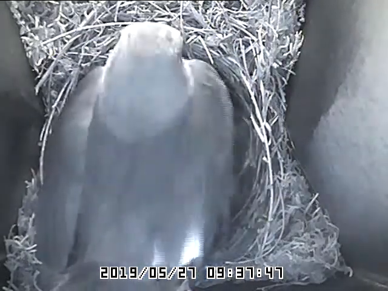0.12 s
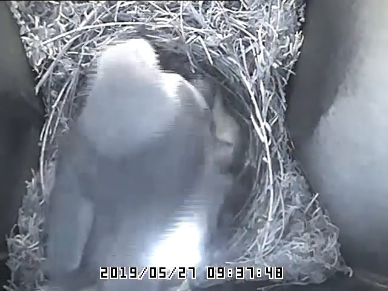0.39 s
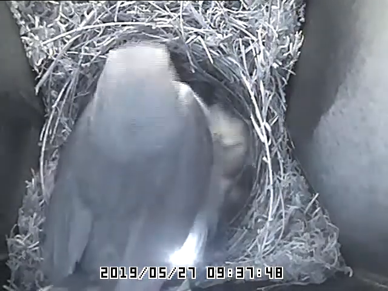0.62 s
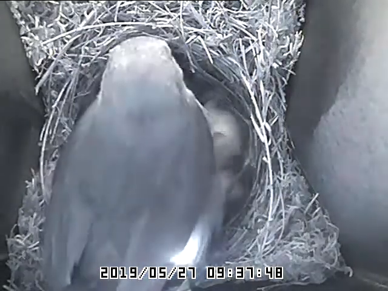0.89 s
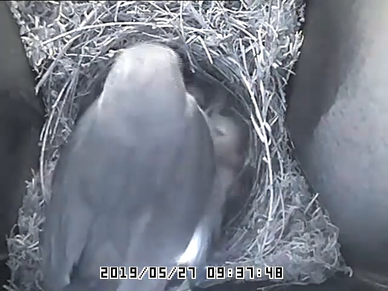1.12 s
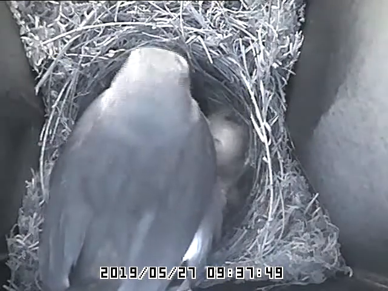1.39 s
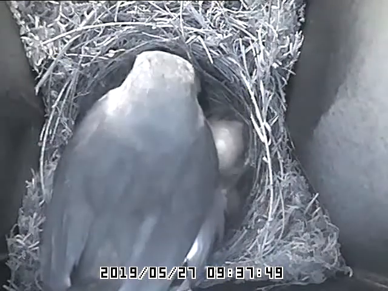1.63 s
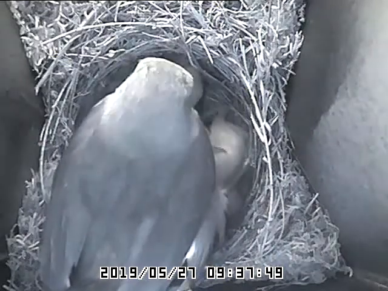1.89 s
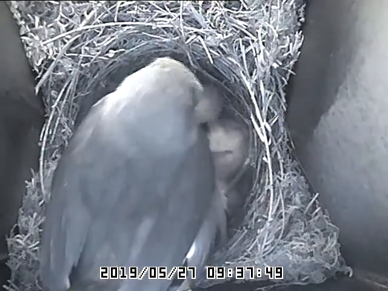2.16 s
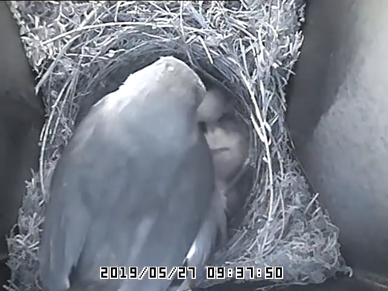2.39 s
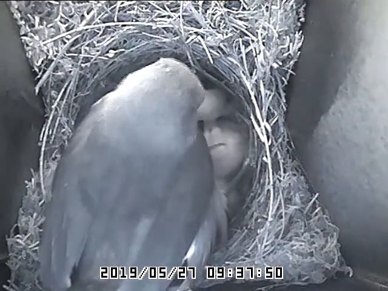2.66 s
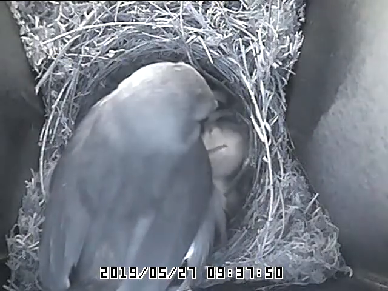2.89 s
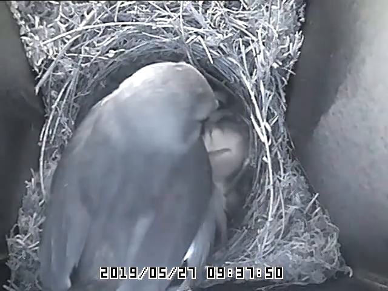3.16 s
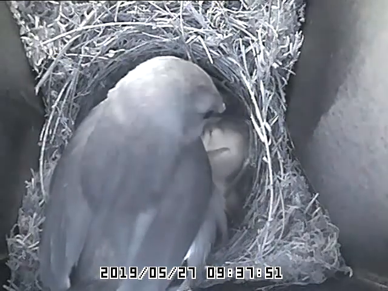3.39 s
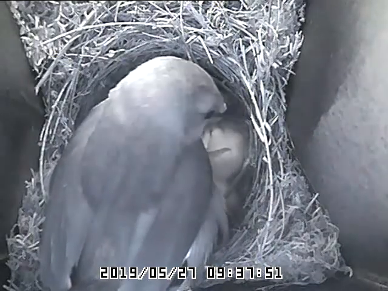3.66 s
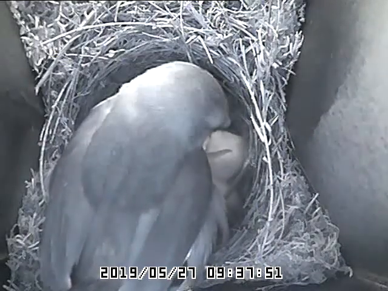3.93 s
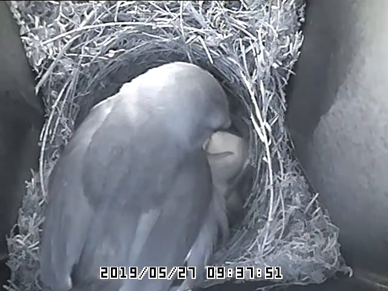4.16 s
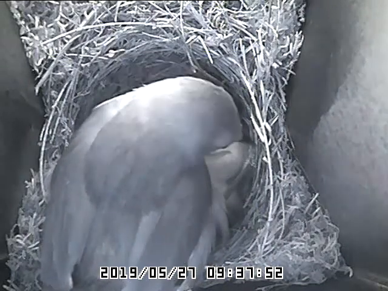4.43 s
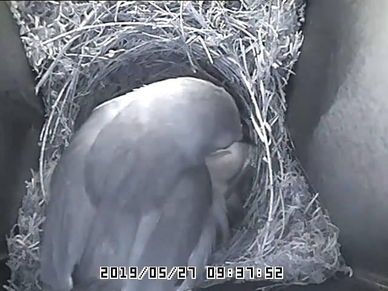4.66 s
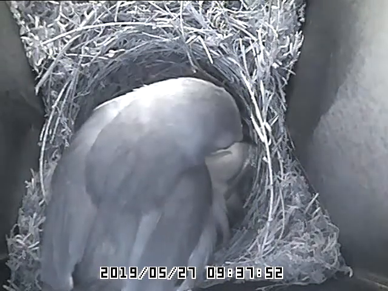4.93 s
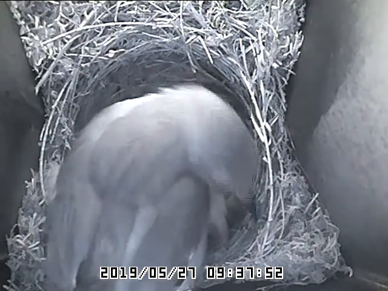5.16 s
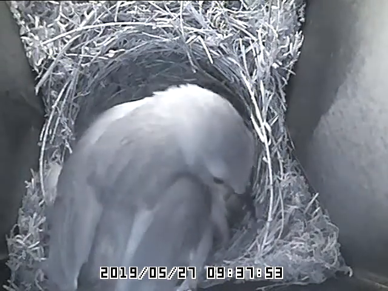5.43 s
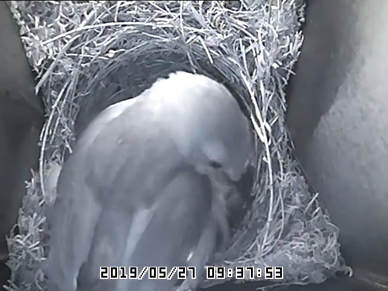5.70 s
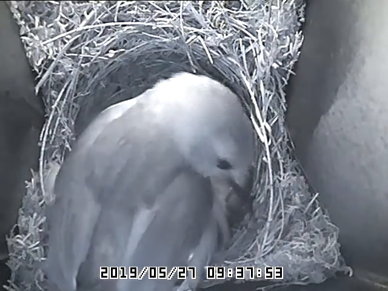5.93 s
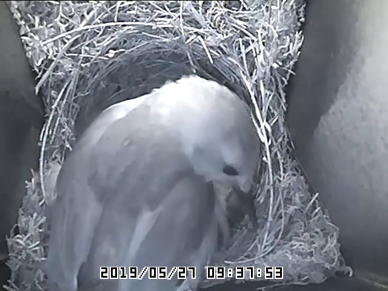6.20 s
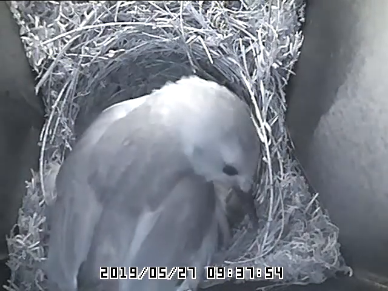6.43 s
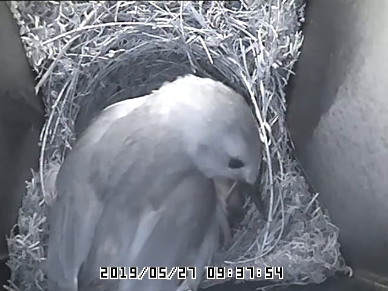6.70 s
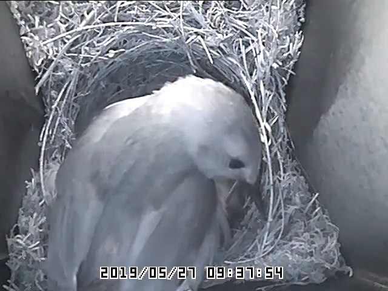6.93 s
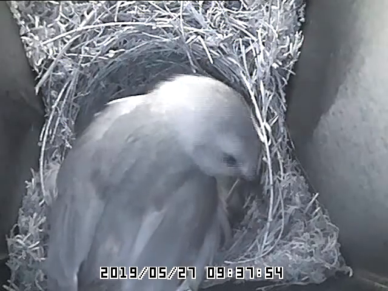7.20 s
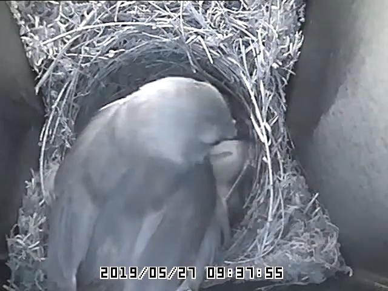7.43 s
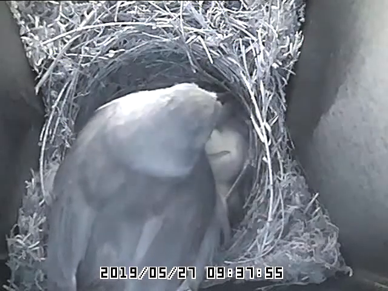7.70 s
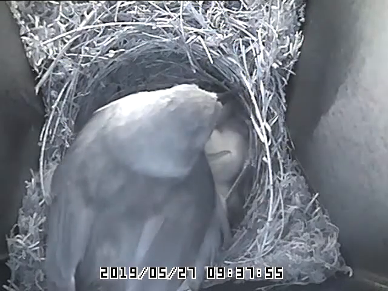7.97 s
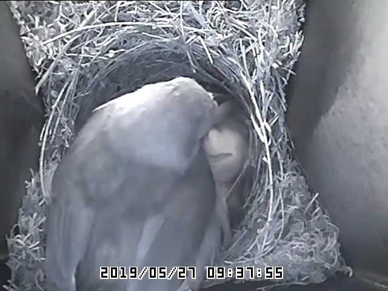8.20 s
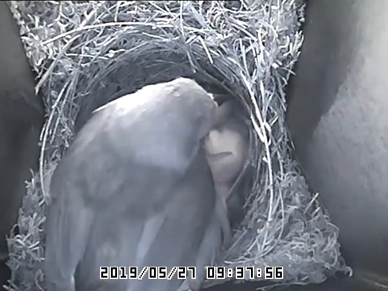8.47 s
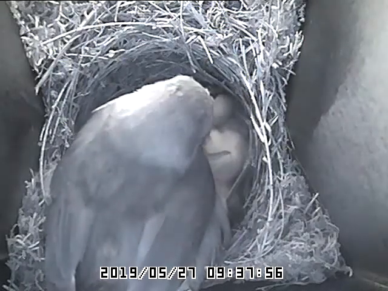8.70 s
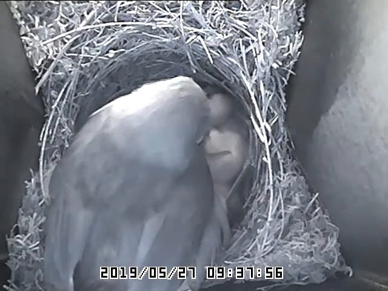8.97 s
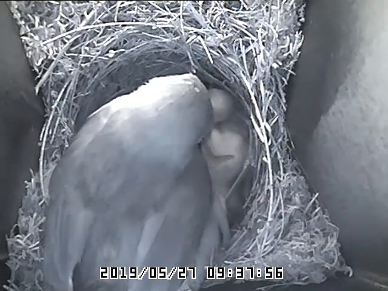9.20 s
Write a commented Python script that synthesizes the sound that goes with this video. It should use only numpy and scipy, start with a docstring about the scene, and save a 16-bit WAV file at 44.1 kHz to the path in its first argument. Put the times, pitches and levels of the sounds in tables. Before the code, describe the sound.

Tiny high peeps from a nestling about once a second over steady camera buzz, thin whine and hiss, with buzzy birdsong echoing outside.

```python
"""Inside a wooden nest box, heard through a cheap camera: a nestling peeps, mostly about once a second, as
pure arches in pitch through a box resonance. Birds outside sing buzzing glides with scattered echoes;
there are faint squeaks in the box, whistles mostly outside, and one sharp two-voiced call in the box.
The picture signal leaks in: a folded-down line tone and a supply whistle, both cut 50 times a second, over hiss.
Sampling at 16 kHz gives whatever lies near 8 kHz a mirror image above it."""
import sys
import numpy as np
from scipy import signal
from scipy.fft import rfft, irfft, next_fast_len
from scipy.io import wavfile
from scipy.ndimage import uniform_filter1d

SR = 44100
rng = np.random.default_rng(int(sys.argv[2]) if len(sys.argv) > 2 else 0)


def store_pcm(level_fs):
    """Save levels as 16-bit WAV."""
    pcm = np.round(np.clip(level_fs, -1, 1) * 32767).astype(np.int16)
    wavfile.write(sys.argv[1], SR, np.atleast_2d(pcm).T)


def ratio(d):
    """dB to gain"""
    e = np.asarray(d, float) / 20
    return 10 ** e


N = 411894
T = np.arange(N) / SR
SAMPLE_HZ = 16000  # sampling rate of the camera's sound


def shaped(x, points):
    """Filter by a table of (Hz, dB), straight lines between points."""
    size = next_fast_len(N)
    hz, db = np.transpose(points)
    bins_hz = np.arange(size // 2 + 1) * SR / size
    return irfft(rfft(x, size) * ratio(np.interp(bins_hz, hz, db)), size)[:N]


def resonance(x, hz, width_hz):
    """Two-pole peak with gain 1 on top."""
    r = np.exp(-np.pi * width_hz / SR)
    zeros = [(1 - r * r) / 2, 0, (r * r - 1) / 2]
    poles = [1, -2 * r * np.cos(2 * np.pi * hz / SR), r * r]
    return signal.lfilter(zeros, poles, x + 1e-18)


def wander(draws):
    """Random values spread evenly over the scene, joined by straight lines."""
    return np.interp(T, np.linspace(0, T[-1], len(draws)), draws)


def add(out, start_s, hz, level, fade_s):
    """Lay in a sine of given pitch and rms level per sample, with soft ends."""
    t = np.arange(len(hz)) / SR
    ends = np.clip(np.minimum(t, t[-1] - t) / fade_s, 0, 1)
    tone = np.sqrt(2) * level * ends * np.sin(2 * np.pi * np.cumsum(hz) / SR)
    at = round(start_s * SR)
    out[at:at + len(hz)] += tone[:N - at]


def camera():
    """Tones above half the sampling rate fold down; all fall away while the picture is blanked."""
    line_hz, field_hz, supply_hz = 15623.809, 49.9962, 9998.019
    blank_from_ms, blank_to_ms = 17.55, 19.15
    # Overtones of the line tone. Each row: multiple, rms level in dB before brightness.
    line_tone = [(1, -37.5), (2, -51), (3, -59), (4, -64), (5, -68), (6, -70), (7, -82), (8, -69.5)]
    # Steady brightness down a field. Each row: time in ms, level in dB, sideways shift in rad.
    picture = [(0.35, 2.4, -0.12), (1.0, 1.5, -0.052), (2.5, -2, 0.045), (4.5, -1.83, 0.003),
               (5.5, -0.37, 0.023), (7.0, -0.3, 0.1), (8.5, -1.07, 0.059), (10.0, -1.5, 0.041),
               (10.5, 0, -0.073), (13.5, 1, -0.032), (15, -1.5, -0.27), (16.5, -0.3, 0.052),
               (17.5, 2.5, -0.00043)]
    # The parent's pale head, a bright patch that mostly sinks as it bends over the brood.
    # Each row: time in seconds, place down the field in ms.
    head = [(0.0, 3.5), (1.4, 2.96), (4.2, 3.67), (5.0, 4.74), (7.2, 4.5), (7.7, 5)]
    # Edge ticks, a row for even fields and one for odd: height in dB at blanking start, at blanking end,
    # before the line phase scales it.
    edge_db = [
        [-33.5, -25.5],
        [-45.5, -38.5],
    ]
    # Steady kicks of the field sync. Each row: time in ms, height.
    sync = [(17.62, -0.034), (17.86, 0.0083), (19.0, -0.0011)]

    ms = T * field_hz % 1 * 1000 / field_hz  # time into the field
    blank = uniform_filter1d(1. * ((ms > blank_from_ms) & (ms < blank_to_ms)), size=4)

    down_ms, still_db, shift_rad = np.transpose(picture)
    head_ms = np.interp(T, *np.transpose(head))
    head_db = 3.0 * np.exp(-((ms - head_ms) / 1.37) ** 2)
    # a patch of glare low in the picture fades out over 1.5 s
    glare_db = 3.5 * np.exp(-((ms - 12.3) / 1.3) ** 2) * np.clip(1 - T / 1.5, 0, 1)
    bright_db = np.interp(ms, down_ms, still_db, period=20) + head_db + glare_db
    aside_rad = np.interp(ms, down_ms, shift_rad, period=20)

    turn = 2 * np.pi * (SAMPLE_HZ - line_hz) * T
    line = sum(ratio(db) * np.cos(k * (turn + aside_rad) - 1.15 + 1.5 * np.log(k)) for k, db in line_tone)
    waver_db = 0.47 * wander(rng.standard_normal(100))
    blank_line_db, blank_supply_db = -21, -8
    line *= np.sqrt(2) * ratio(bright_db + waver_db) * (1 - blank * (1 - ratio(blank_line_db)))

    # the picture loads the supply: it sags and is pulled to and fro in each field
    wobble_rad, wobble_top_ms = 0.42, 7.6
    wobble = wobble_rad * np.cos(2 * np.pi * field_hz * (ms - wobble_top_ms) / 1000)
    swing = 2 * np.pi * supply_hz * T - wobble
    clock = 2 * np.pi * SAMPLE_HZ * T
    supply = ratio(-37.5) * np.cos(clock - swing)
    supply += ratio(-55) * np.cos(2 * swing - clock)  # second harmonic, folded
    sag_db = -3 * ((ms + 1) % 20) / 20
    # softer-edged blanking that ends 12 samples sooner
    slow_blank = uniform_filter1d(np.maximum(0, blank + np.roll(blank, -12) - 1), size=15)
    supply *= np.sqrt(2) * ratio(sag_db) * (1 - slow_blank * (1 - ratio(blank_supply_db)))

    # interlace cuts every other field half a line off: its edges tick in step with the line tone
    field = np.arange(int(T[-1] * field_hz))
    ticks = np.zeros(N)
    edges_ms = (blank_from_ms - .08, blank_to_ms + .05)
    for edge_ms, sign, db in zip(edges_ms, (-1, 1), np.transpose(edge_db)):
        at = ((field / field_hz + edge_ms / 1000) * SR).astype(int)
        ticks[at] = sign * ratio(db[field % 2]) * np.sin(turn[at] - 1.15)
    for kick_ms, height in sync:
        at = ((field / field_hz + kick_ms / 1000) * SR).astype(int)
        ticks[at] += height
    ticks = np.convolve(ticks, np.hanning(7), "same")

    blank_step, offset = .002, -.0051  # full scale = 1
    return line + supply + ticks + blank_step * blank + offset


def hiss():
    """Amplifier noise and far air, up to half the sampling rate."""
    # Spectrum of the noise. Each row: frequency in Hz, relative level in dB.
    hiss_spectrum = [(30, -8), (100, -5), (300, -1.5), (600, -2.5), (1000, -5), (2500, -5.5), (3800, -2),
                     (4800, -4.5), (5600, -1), (6500, -1.5), (7100, -6), (8000, -8)]
    rms_db = -49
    noise = shaped(rng.standard_normal(N), hiss_spectrum + [(SAMPLE_HZ / 2 + 1, -120)])
    return ratio(rms_db) * noise / np.std(noise)


def song(calls):
    """Glides with an uneven buzz in pitch, smeared by scattered echoes from the trees."""
    # Notes sung. Each row: start in seconds, kind of note, length in seconds, level in dB before flutter and echo.
    song_notes = [(0, "whistle", .11, -42.5), (.12, "high", .17, -45.5), (0.205, "trill", 0.15, -44),
                  (.41, "high", 0.094, -43.5), (0.466, "trill", .15, -45), (.682, "low", 0.092, -51.5),
                  (.75, "buzz", 0.15, -52), (.9, "low", .14, -53.5), (.998, "trill", .14, -52.5),
                  (1.16, "seep", 0.12, -60), (1.325, "rise", 0.058, -55), (1.44, "seep", 0.097, -56),
                  (1.47, "short", .036, -52), (1.54, "short", 0.054, -54), (1.583, "rise", 0.055, -53),
                  (1.679, "upper", 0.22, -59), (1.7, "seep", .087, -54), (1.835, "rise", 0.06, -51.5),
                  (1.63, "buzz", .1, -53), (1.88, "buzz", 0.13, -54), (2.092, "rise", 0.062, -50),
                  (2.143, "buzz", .12, -54), (2.22, "seep", .04, -55), (3.125, "upper_whistle", .12, -53),
                  (3.6, "far", .08, -53), (3.78, "far", .13, -58), (3.8, "buzz", 0.056, -55),
                  (3.95, "upper_whistle", .07, -56), (4.057, "buzz", .045, -45.5),
                  (4.108, "upper_whistle", .05, -50), (5.5, "short", 0.16, -59),
                  (6.996, "buzz", 0.078, -52), (7.13, "upper_whistle", 0.092, -58),
                  (7.566, "whistle", 0.16, -45.5), (7.763, "pip", .045, -46),
                  (7.809, "upper_whistle", 0.13, -42), (8.002, "high", 0.1, -43.5),
                  (8.05, "trill", 0.14, -45), (8.24, "high", 0.094, -44), (8.299, "trill", .14, -44),
                  (8.5, "low", 0.14, -55), (8.561, "buzz", .18, -53), (8.567, "upper", .12, -51),
                  (8.75, "low", 0.072, -53), (8.8, "upper", .06, -51), (8.84, "buzz", 0.14, -53.5),
                  (9.094, "rise", 0.046, -49), (9.118, "buzz", 0.073, -45), (9.13, "held", .17, -51.5)]
    # Kinds of note. Each entry: from Hz, to Hz, nominal buzz width in Hz, power of the glide,
    # level change along the note in dB.
    note_kinds = dict(whistle=(5050, 4590, 110, .25, -3), upper_whistle=(5000, 4740, 130, .25, -5),
                  high=(5800, 5850, 76, 1.1, -5), trill=(4820, 4450, 400, 1.2, -6),
                  low=(3830, 3750, 86, 1.5, -5), buzz=(4750, 4700, 300, 1.1, -6),
                  upper=(5350, 5400, 160, 1.1, -5), rise=(4000, 5050, 70, 2.6, 5),
                  seep=(7100, 7080, 96, 1.1, -5), short=(4500, 4500, 50, 1.1, -5),
                  pip=(4050, 4030, 51, 1.1, -5), far=(3350, 3300, 281, 1.1, -5),
                  held=(4880, 4830, 90, 1.1, -6))
    edge_s, direct_db, t60_s = 0.0091, -1, 0.95

    buzz_per_s = 130 * wander(rng.uniform(.2, 1.7, 900))
    depth = wander(rng.uniform(.25, 1.7, 700))
    buzz = depth * np.sin(2 * np.pi * np.cumsum(buzz_per_s) / SR)
    dry_song = np.zeros(N)
    for start_s, kind, length_s, db in song_notes:
        from_hz, to_hz, width_hz, power, fade_db = note_kinds[kind]
        part = buzz[round(start_s * SR):round((start_s + length_s) * SR)]
        along = np.linspace(0, 1, len(part))
        hz = from_hz + (to_hz - from_hz) * along ** power + width_hz * part
        add(dry_song, start_s, hz, ratio(db + fade_db * along), edge_s)

    flutter_db = 4.3 * wander(rng.uniform(-0.58, 1, 1200))
    tail = rng.standard_normal(SR) * ratio(-60 * T[:SR] / t60_s)
    tail /= np.sqrt(np.sum(tail ** 2))
    # the faint squeaks and whistles echo too, duller
    echoed = dry_song + ratio(-3) * shaped(calls, [(5000, 1.5), (7000, -15.5)])
    echoes = signal.fftconvolve(echoed, tail)[:N]
    heard = ratio(direct_db) * ratio(flutter_db) * dry_song + echoes
    # the box favours this band of what comes in from outside
    entrance_hz, entrance_width_hz, entrance_db = 4720, 500, -6
    return heard + ratio(entrance_db) * resonance(heard, entrance_hz, entrance_width_hz)


def nestling():
    """Pure arches, loudest where they cross the resonance of the box."""
    # Peeps. Each row: start in seconds, rise in seconds, fall in seconds, top in Hz, end in Hz.
    peeps = [(0.26, 0.022, 0.044, 7280, 6420), (1.318, 0.029, 0.022, 6950, 6520),
             (2.479, 0.028, 0.025, 7380, 6900), (3.445, 0.028, 0.027, 7360, 7000),
             (5.986, 0.017, 0.031, 6926, 6420), (6.919, 0.018, 0.025, 6990, 6450),
             (7.95, 0.022, 0.03, 7230, 7030), (9.002, 0.022, 0.02, 7230, 6900)]
    start_hz, arch_power = 6200, 2.3
    box_hz, box_width_hz, direct_db = 7000, 320, -12
    out = np.zeros(N)
    for start_s, rise_s, fall_s, top_hz, end_hz in peeps:
        db = -29.7 + 4 * (top_hz / 1000 - 7)  # more effort lifts pitch and level
        t = np.arange(round((rise_s + fall_s) * SR)) / SR - rise_s
        drop_hz = np.where(t < 0, top_hz - start_hz, top_hz - end_hz)
        from_top = np.abs(t / np.where(t < 0, rise_s, fall_s))
        add(out, start_s, top_hz - drop_hz * from_top ** arch_power, ratio(db), .004)
    return resonance(out, box_hz, box_width_hz) + ratio(direct_db) * out


def whistles():
    """Faint gliding sines, squeaks in the box and whistles mostly outside, all fluttering in level."""
    # Higher peeps, a steep rise that may bend over.
    # Each row: start in seconds, length in seconds, top the rise aims at in Hz, starting level in dB before flutter.
    squeaks = [(1.9, .02, 8640, -50), (1.937, 0.023, 8600, -47), (2.926, 0.017, 8600, -48),
               (7.051, .065, 8960, -50.5), (8.128, 0.067, 8700, -49.5), (9.094, 0.031, 8800, -52),
               (8.912, .012, 9000, -48)]
    # Whistled glides, most from a bird outside; the last goes with the sharp call in the box.
    # Each row: start in seconds, length in seconds, from Hz, to Hz, level in dB before flutter.
    glides = [(2.955, .025, 6750, 6900, -55), (3.562, .018, 2260, 3900, -50),
              (3.58, 0.023, 3740, 3100, -48), (3.644, 0.086, 1940, 3620, -50),
              (3.723, .035, 4050, 3950, -53), (3.757, .045, 3750, 3200, -47),
              (3.82, 0.036, 3470, 3600, -53), (3.842, 0.083, 2980, 1990, -50.5),
              (4.94, 0.028, 4600, 5600, -51)]
    start_hz, rise_s, sag_hz_per_s, fade_db_per_s = 6900, 0.011, 16000, 89
    flutter_db = 6.4 * wander(rng.uniform(-1.2, 1, 1200))
    wobble_hz = 70 * wander(rng.standard_normal(2500))
    out = np.zeros(N)
    for at_s, length_s, top_hz, db in squeaks:
        t = T[:round(length_s * SR)]
        rise_hz = top_hz - (top_hz - start_hz) * np.exp(-t / rise_s)
        sag_hz = sag_hz_per_s * np.maximum(0, t - length_s / 2)
        add(out, at_s, rise_hz - sag_hz, ratio(db - fade_db_per_s * t), .006)
    for at_s, length_s, from_hz, to_hz, db in glides:
        part_hz = wobble_hz[round(at_s * SR):round((at_s + length_s) * SR)]
        add(out, at_s, np.linspace(from_hz, to_hz, len(part_hz)) + part_hz, ratio(db), .005)
    return out * ratio(flutter_db)


def sharp_call():
    """One call in the box: two clean voices overlap, one falling, one level."""
    # One list per voice. Each row: time in seconds, pitch in Hz, rms level in dB.
    call_voices = [
        [(4.946, 6140, -39), (4.957, 5820, -28.5), (4.968, 5030, -39), (4.978, 3720, -52), (4.988, 3330, -41),
         (5.002, 3200, -50), (5.018, 3400, -53), (5.03, 3350, -50), (5.04, 3500, -53)],
        [(4.978, 6170, -44), (4.985, 6280, -36), (5.002, 6400, -39), (5.014, 6380, -42), (5.02, 6300, -48),
         (5.042, 6320, -50)],
    ]
    out = np.zeros(N)
    for rows in call_voices:
        at_s, hz, db = np.transpose(rows)
        t = np.arange(at_s[0], at_s[-1], 1 / SR)
        add(out, at_s[0], np.interp(t, at_s, hz), ratio(np.interp(t, at_s, db)), .003)
    return out


def scene():
    """Birds in the box and outside over the camera's own noise."""
    calls = whistles()
    birds = nestling() + sharp_call() + calls + song(calls)
    return (birds + camera() + hiss())[None]


def band_limit(x):
    """A steep low-pass at the top of the band."""
    return signal.sosfilt(signal.butter(12, 9430, fs=SR, output="sos"), x)


def record(dry):
    """Sampling mirrors the spectrum about 8 kHz; a lax low-pass lets the nearest part of the image through."""
    # Low-pass after the samples are spread out again. Each row: frequency in Hz, gain in dB.
    smoothing = [(6500, -1), (7500, 0), (8000, -4), (8500, -15.5), (9000, -36), (9400, -60.5), (9600, -95)]
    mirrored = dry[0] * (1 + 2 * np.cos(2 * np.pi * SAMPLE_HZ * T))
    mix = shaped(mirrored, smoothing)[None]
    return band_limit(mix)


dry = scene()
out = record(dry)
store_pcm(out)
```